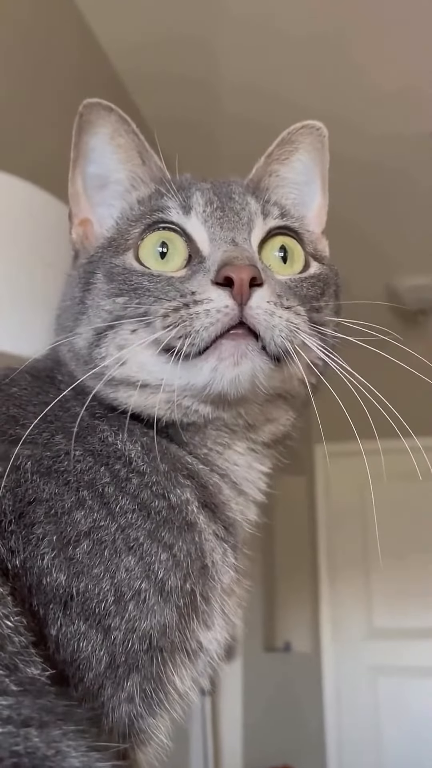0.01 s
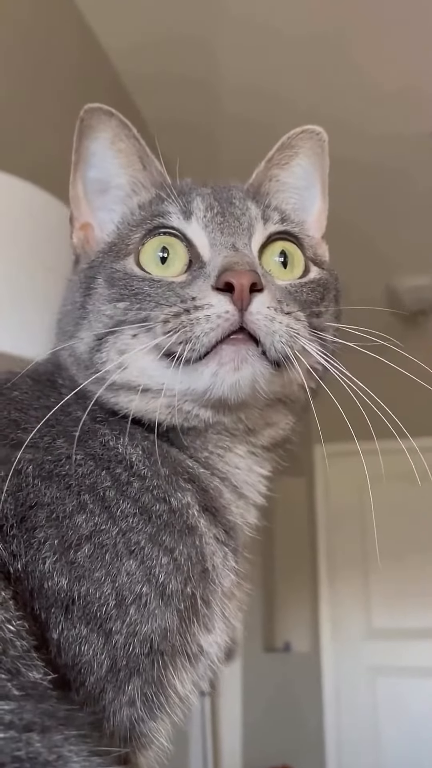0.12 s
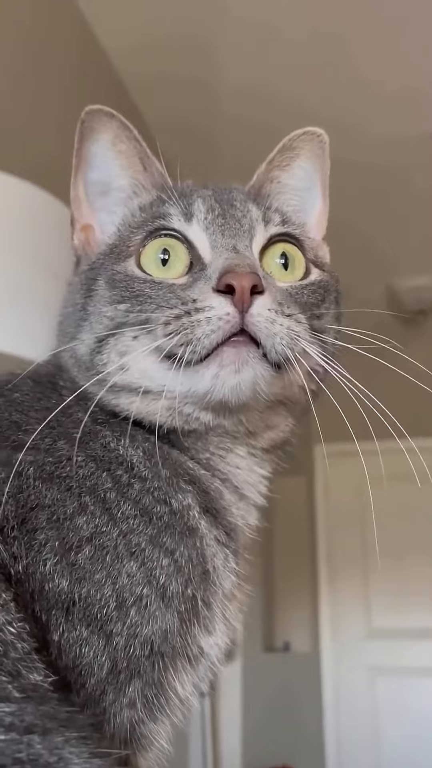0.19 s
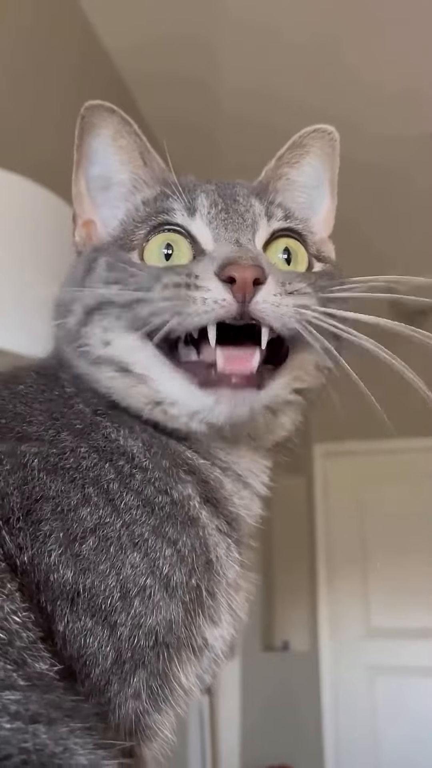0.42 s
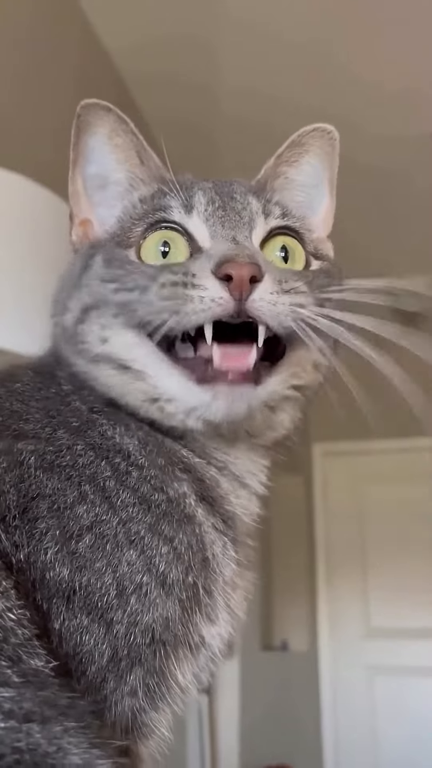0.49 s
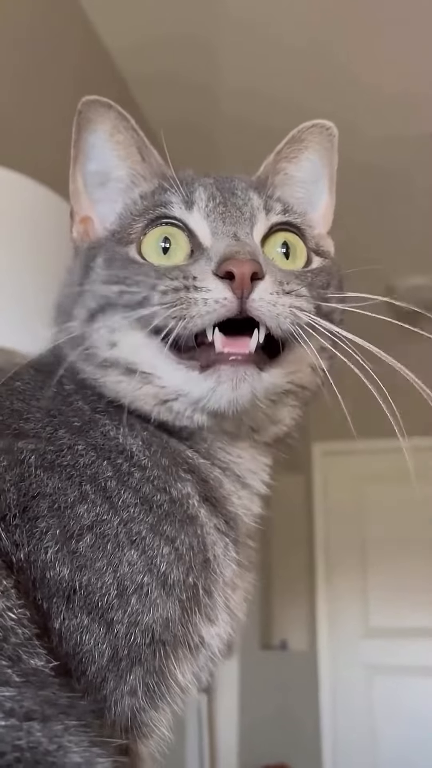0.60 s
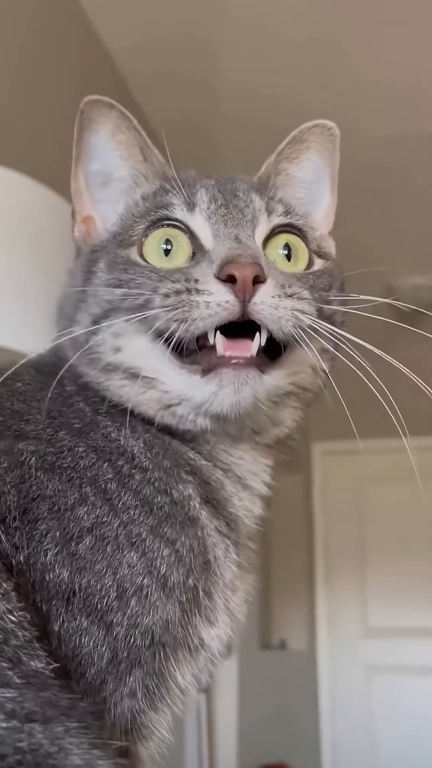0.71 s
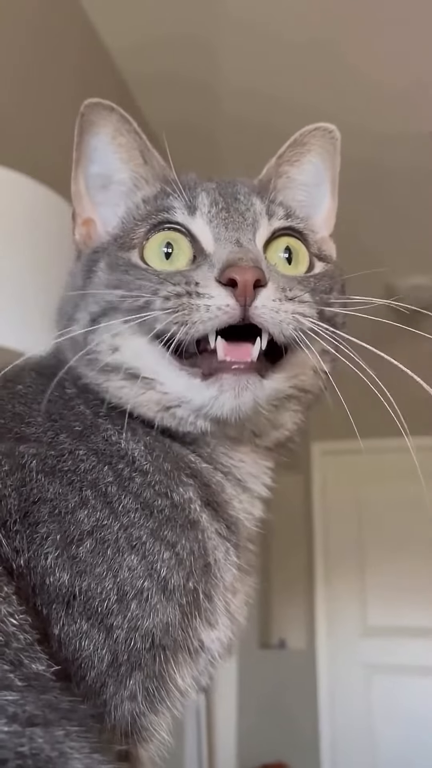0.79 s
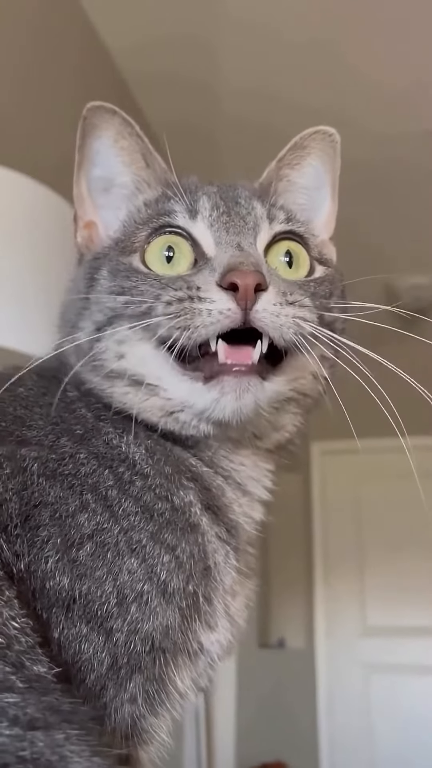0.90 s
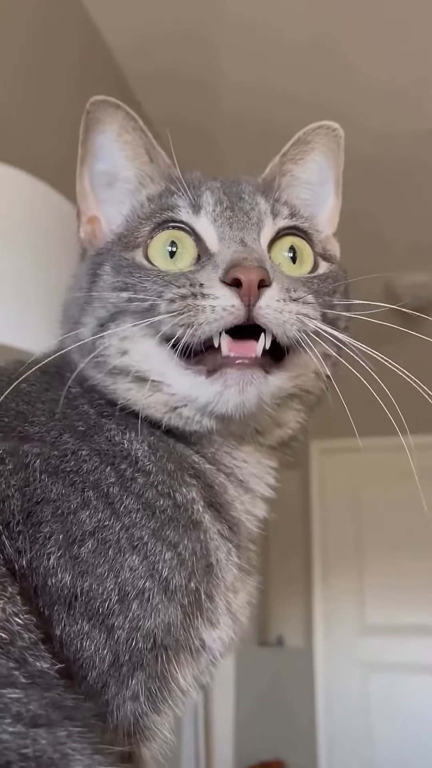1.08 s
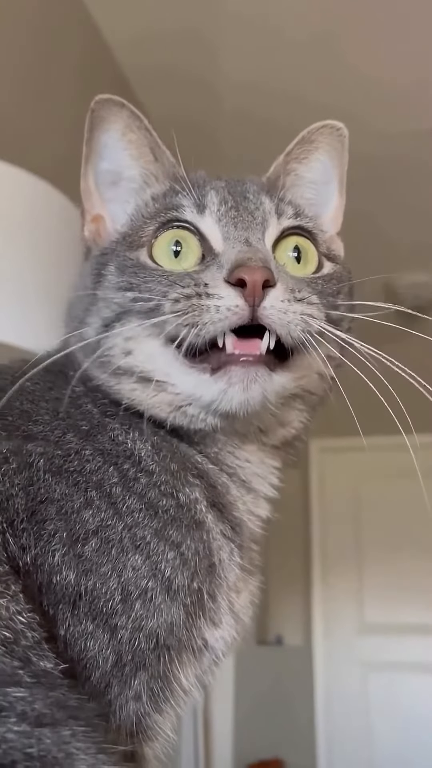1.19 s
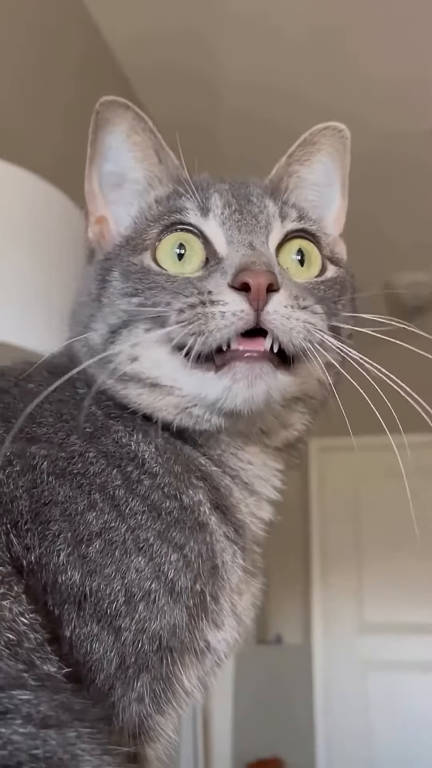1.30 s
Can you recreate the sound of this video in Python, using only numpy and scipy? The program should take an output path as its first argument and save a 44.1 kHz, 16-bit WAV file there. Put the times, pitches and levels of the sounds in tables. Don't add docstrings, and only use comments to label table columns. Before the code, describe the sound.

Cat chatter indoors, close and dry: soft nose hiss, one very brief raspy chirp fading into airy breath, then quiet, wet ticks and a bright tooth click with a short puff bumping the microphone, over faint low ventilation rumble.

```python
import sys
import numpy as np
from scipy import signal
from scipy.fft import rfft, irfft, next_fast_len
from scipy.io import wavfile
from scipy.ndimage import map_coordinates

SR = 44100
rng = np.random.default_rng(int(sys.argv[2]) if len(sys.argv) > 2 else 0)


def ratio(d):
    e = np.asarray(d, float) / 20
    return 10 ** e


def bounce(signal):
    frames = np.transpose(np.atleast_2d(signal))
    limited = np.clip(frames, -1, 1)
    pcm = np.round(limited * 32767).astype(np.int16)
    wavfile.write(sys.argv[1], SR, pcm)


N = 61740


def unit(x):
    return x / np.sqrt(np.mean(x ** 2) + 1e-20)


def along(points, hz):
    f, v = np.transpose(points)
    return np.interp(np.log(hz + 1), np.log(f + 1), v)


def curves(rows):
    s, *cols = np.transpose(rows)
    return [np.interp(np.arange(N) / SR, s, c) for c in cols]


def wobble(rate):
    knots = rng.standard_normal(int(N * rate / SR) + 4)
    return map_coordinates(knots, [np.arange(N) * rate / SR])


def filtered(x, response):
    m = 2 * next_fast_len(N // 2 + SR // 4)
    return irfft(rfft(x, m) * response(np.fft.rfftfreq(m, 1 / SR)), m)[..., :N]


def causal(db):
    c = irfft(np.log(ratio(db) + 1e-6))
    c[1:len(c) // 2] *= 2
    c[len(c) // 2 + 1:] = 0
    return np.exp(rfft(c))


def tract(peaks):
    def response(f):
        total = 0
        for k, (c, w, db) in enumerate(peaks):
            total = total + (-1) ** k * ratio(db) * 1j * f * w / (c * c - f * f + 1j * f * w)
        return total
    return response


def noise(response):
    return unit(filtered(rng.standard_normal(N), response))


def puff(row, peaks):
    start, swell, hold, t60, db = row
    t = np.arange(N) / SR - start
    fade_db = 60 * np.maximum(t - swell - hold, 0) / t60
    shape = np.clip(t / swell, 0, 1) ** 0.68 * ratio(db - fade_db)
    flutter = ratio(1.4 * wobble(180))
    return shape * flutter * noise(tract(peaks))


def contacts(rows, peaks):
    out, t = np.zeros(N), np.arange(N) / SR
    for s, db, t60 in rows:
        push = ratio(-60 * t / t60) * rng.standard_normal(N) * .3
        push[0] = 1
        ring = filtered(push, tract(peaks))
        start = round(s * SR)
        out[start:] += ratio(db) * ring[:N - start] / np.abs(ring).max()
    return out


def background():
    # t/s, level/dB
    fan_strength = [(0.0, -52.5), (0.116, -49.5), (0.444, -49.5), (0.62, -56.5), (1.4, -64)]
    # f/Hz, density/dB per Hz
    duct_tone = [(13, -41), (22, -24.5), (49, 1.5), (123, -5), (178, -9), (217, -15), (500, -26),
                 (650, -64.5), (1100, -120)]
    # f/Hz, density/dB per Hz
    air_tone = [(76, -32), (130, -7), (170, -14.5), (220, -11.5), (520, -24), (596, -27), (742, -26.5),
                (5650, -34), (7400, -42.5), (9620, -72.5), (16300, -120)]
    hum_hz, hum_db, air_db, air_top_hz = 120.8, -53, -56.5, 6900
    strength_db, = curves(fan_strength)
    swing_db = strength_db - strength_db.mean()
    rumble = ratio(strength_db + 4 + 1.9 * wobble(9.4)) * noise(lambda f: ratio(along(duct_tone, f)))
    hum_phase = 2 * np.pi * hum_hz * np.cumsum(1 + 0.038 * wobble(8)) / SR
    hum = ratio(hum_db + .6 * swing_db + 4 * wobble(7)) * np.sin(hum_phase)
    air_level = ratio(air_db + .2 * swing_db + 0.38 * wobble(4.1))
    air = air_level * noise(lambda f: ratio(along(air_tone, f)) * (f < air_top_hz))
    return rumble + hum + air


def sniff():
    # t/s, level/dB
    hiss = [(0, -64), (.15, -60.5), (.21, -50.5), (.3, -61.5), (.42, -86.5), (.6, -92)]
    # f/Hz, width/Hz, level/dB
    nose = [(1800, 310, -3.5), (3600, 380, -6), (6200, 390, 1), (7000, 220, -1)]
    level = ratio(curves(hiss)[0] + 1.5 * wobble(30))
    return level * noise(lambda f: tract(nose)(f) * (f < 7400))


def chirp():
    # t/s, pitch/Hz, level/dB, slack/dB lost per overtone
    call = [
        (.2170, 800, -29, 3),
        (.2215, 780, -13, 3.5),
        (.23, 716, -13, 1),
        (.243, 724, -12.5, 0),
        (.251, 688, -15, .3),
        (.265, 724, -16, 1.2),
        (.270, 795, -16, 3.5),
        (.277, 795, -19, 4),
        (.2825, 950, -24, 14),
    ]
    # f/Hz, level/dB
    throat = [(500, -1.5), (1450, -2.5), (2170, -0.5), (2900, -8.5), (3600, -8), (4300, -16.5),
              (5100, -26.5), (6300, -15.5), (7600, -32)]
    jitter, shimmer_db, slack_floor_db, dispersion = .003, .35, 19, .55
    let_go_s, lead_s, rise_db_per_s = .003, 0.0068, 1198.5
    t = np.arange(N) / SR
    begin, end = call[0][0], call[-1][0]
    pitch_hz, level_db, slack_db = curves(call)
    phase = 2 * np.pi * np.cumsum(pitch_hz * (1 + jitter * wobble(250))) / SR
    k = np.arange(1, 11)[:, None]
    sizes = ratio(along(throat, k * pitch_hz) - np.minimum(slack_db * (k - 1), slack_floor_db))
    sizes = sizes / np.sqrt(np.sum(sizes ** 2, axis=0) / 2)
    wander = ratio(shimmer_db * np.sqrt(k) * np.array([wobble(150) for _ in k]))
    voice = np.sum(sizes * wander * np.cos(k * phase - dispersion * k ** 2), axis=0)
    rasp = .1 * (1 + np.cos(phase)) * noise(lambda f: ratio(along(throat, f)) * (f > 450))
    opening = np.clip((t - begin + lead_s) / let_go_s + 1, 0, 1)
    closing = np.clip((end - t) / let_go_s + 1, 0, 1)
    rise_db = rise_db_per_s * np.minimum(t - begin, 0)
    return (voice + rasp) * opening * closing * ratio(level_db + rise_db)


def breath():
    # t/s, swell/s, hold/s, fade t60/s, level/dB
    mouth_air = [
        (.225, .05, .024, .15, -30),
        (.951, .006, .014, .11, -36),
    ]
    # t/s, swell/s, hold/s, fade t60/s, level/dB
    throat_air = [
        (.272, .028, .02, .15, -34),
        (.948, .004, 0.036, .08, -44),
    ]
    # f/Hz, width/Hz, level/dB
    open_mouth = [(2150, 500, -5), (3050, 500, -3), (3600, 350, 2), (4800, 600, -8), (6300, 530, -4),
                  (7050, 680, -5)]
    narrow_mouth = [(2464, 500, -5), (3430, 700, -1), (4700, 700, -3), (6100, 900, 0), (6480, 1200, -4)]
    chest = [(350, 450, -6), (620, 250, 1), (1035, 180, 0.5), (1600, 500, -10.5)]
    high = puff(mouth_air[0], open_mouth) + puff(mouth_air[1], narrow_mouth)
    return high + sum(puff(row, chest) for row in throat_air)


def ticks():
    # t/s, peak/dB, f/Hz, t60/s
    films = [
        (.8140, -51, 5500, 0.0034),
        (.8178, -50, 6000, 0.0052),
        (0.85, -48, 6200, 0.0085),
        (0.9083, -42.5, 6300, .004),
        (0.909, -46.5, 6800, 0.0058),
        (0.9144, -43, 6060, .004),
        (.9275, -56, 4650, .012),
    ]
    out, t = np.zeros(N), np.arange(SR // 50) / SR
    for s, db, hz, t60 in films:
        attack = 1 - np.exp(-t / 0.0004)
        ring = ratio(db + 8 - 60 * t / t60) * attack * np.sin(2 * np.pi * hz * t)
        out[round(s * SR):][:len(t)] += ring
    return out


def lip_smacks():
    # t/s, peak/dB, ring t60/s
    smacks = [
        (.9336, -36, .005),
        (.9345, -26, .005),
        (.9366, -23, .006),
    ]
    # f/Hz, width/Hz, level/dB
    lips = [(500, 500, -3), (1200, 700, -6), (2400, 400, 0), (4400, 900, -8), (6200, 900, -8)]
    return contacts(smacks, lips)


def jaw_clicks():
    # t/s, peak/dB, ring t60/s
    knocks = [
        (.9472, -34, .005),
        (.9482, -9.5, .006),
        (.9490, -14, .005),
        (.9510, -18, .008),
    ]
    # f/Hz, width/Hz, level/dB
    teeth = [(400, 180, -14), (1100, 980, -15), (2495, 600, -2), (4350, 1000, -3), (6170, 800, 0)]
    return contacts(knocks, teeth)


def whistle():
    # t/s, swell/s, hold/s, fade t60/s, level/dB
    jet = (.954, .006, .007, .025, -30)
    # f/Hz, width/Hz, level/dB
    jet_mouth = [(2450, 220, -12), (4830, 220, 0), (6350, 500, -9)]
    return puff(jet, jet_mouth)


def room(x):
    # f/Hz, t60/s
    decay = [(300, .3), (1200, 0.1), (2150, .45), (2900, .35), (3600, .45), (4600, .25), (7000, 0.28)]
    hz, t, z = signal.stft(rng.standard_normal(SR // 2), SR, nperseg=256)
    tail = signal.istft(z * ratio(-60 * t / along(decay, hz)[:, None]), SR, nperseg=256)[1]
    late = np.pad(x, (200, 0))
    return signal.fftconvolve(late, tail / np.linalg.norm(tail))[:N]


def bright_ticks():
    # t/s, level/dB
    bright_points = [
        (.9528, -24),
        (.9572, -31),
        (.9688, -21),
        (.9736, -43),
    ]
    impulses = np.zeros(N)
    for s, db in bright_points:
        impulses[round(s * SR)] = ratio(db + 8)
    return filtered(impulses, lambda f: ratio(-2.5 * f / 1000 + 16) * (f > 6500))


def scene():
    cat = sniff() + chirp() + breath() + ticks() + lip_smacks() + jaw_clicks() + whistle()
    echo = ratio(-21) * room(cat)
    return (cat + echo + background())[None]


def band_limit(x):
    return signal.sosfilt(signal.butter(12, 15800, fs=SR, output="sos"), x)


def record(dry):
    top_hz, fall_db_per_khz = 7390, 39

    def path(f):
        slope_db = -fall_db_per_khz * np.clip(f - top_hz, 0, 800) / 1000
        return causal(slope_db - 80 * (f > 9200))
    mix = filtered(dry, path) + bright_ticks()
    return band_limit(mix)


dry = scene()
out = record(dry)
bounce(out)
```